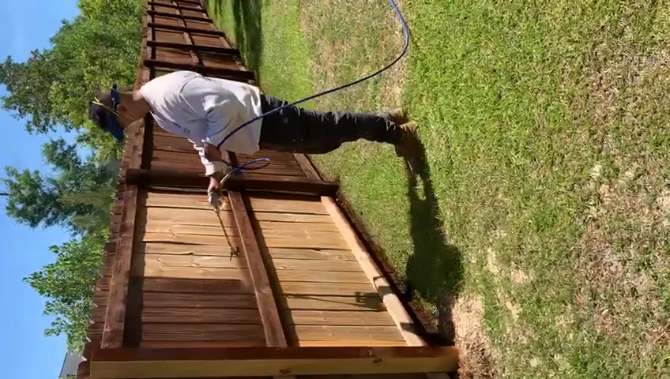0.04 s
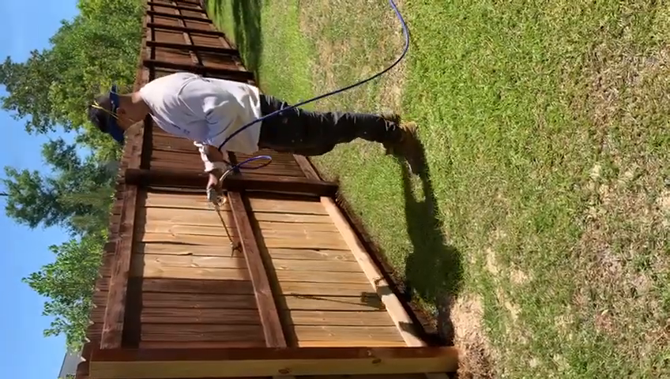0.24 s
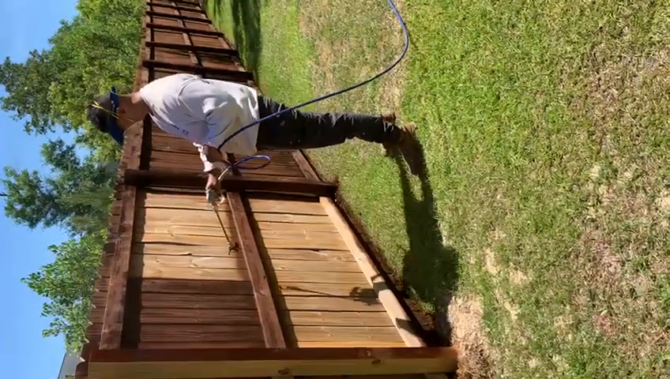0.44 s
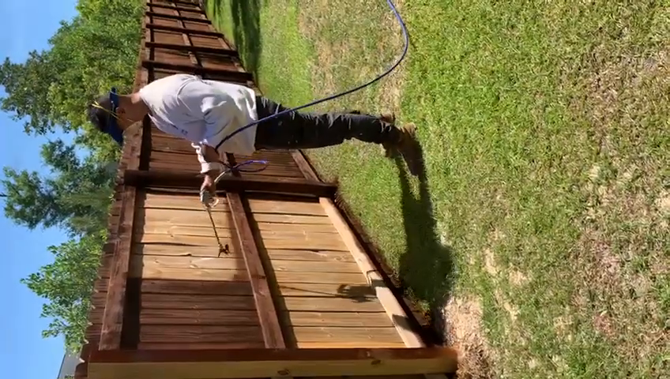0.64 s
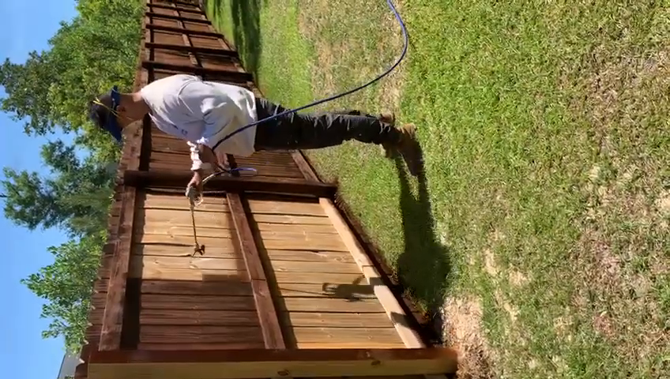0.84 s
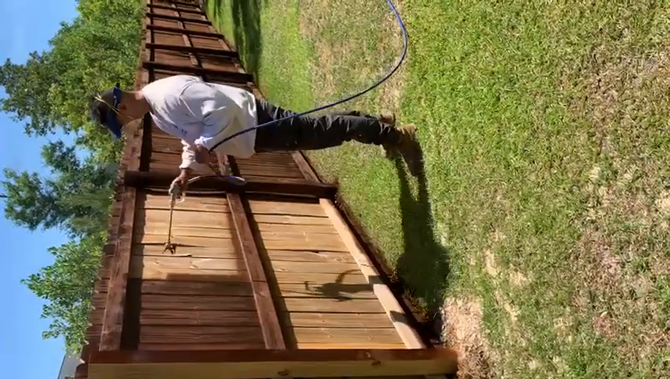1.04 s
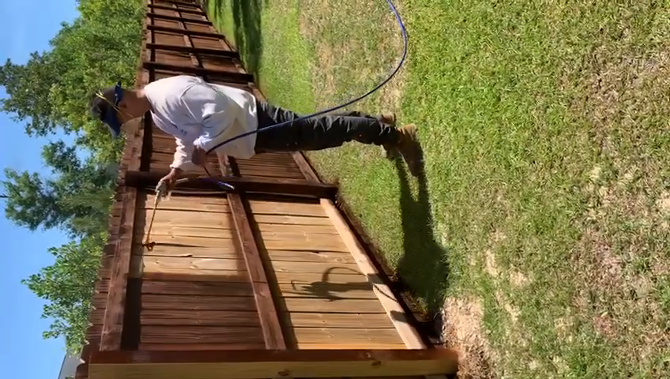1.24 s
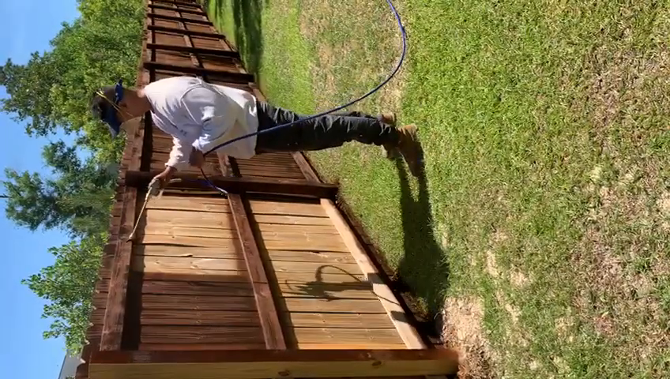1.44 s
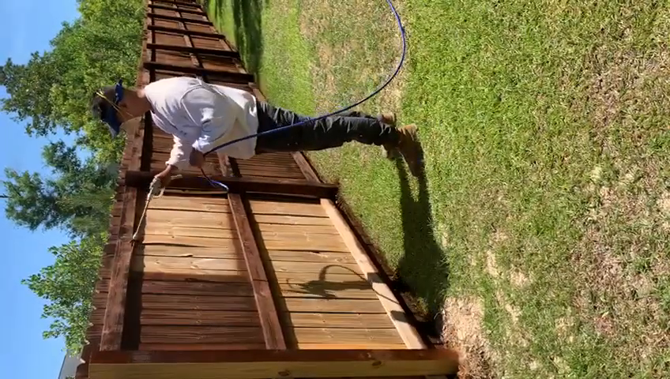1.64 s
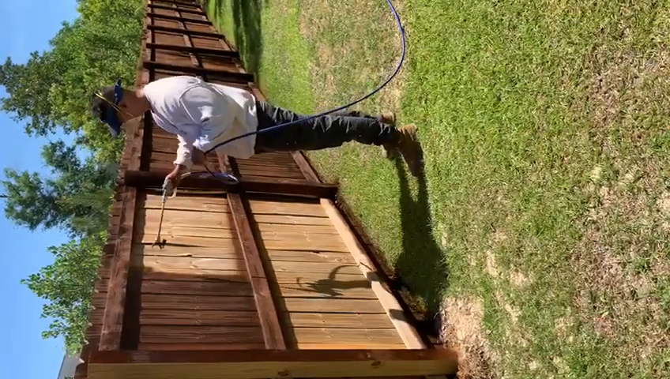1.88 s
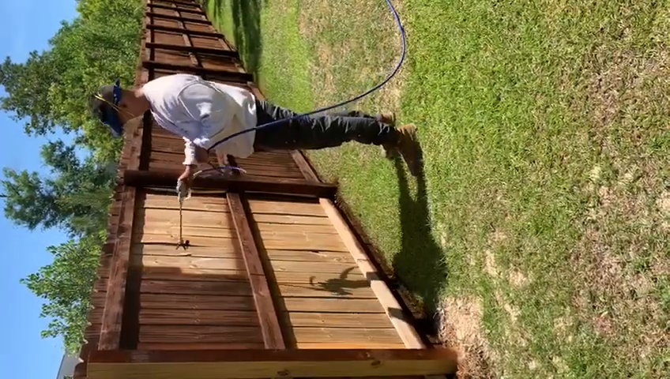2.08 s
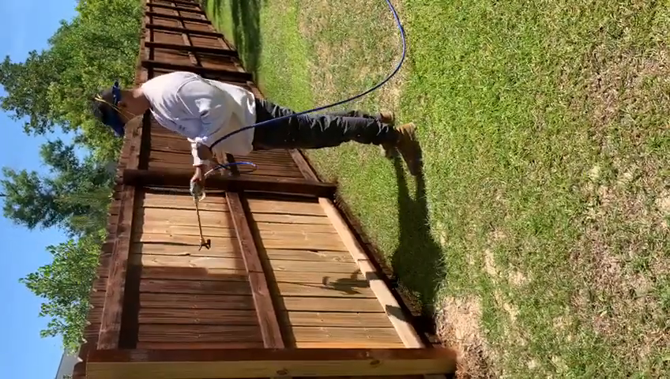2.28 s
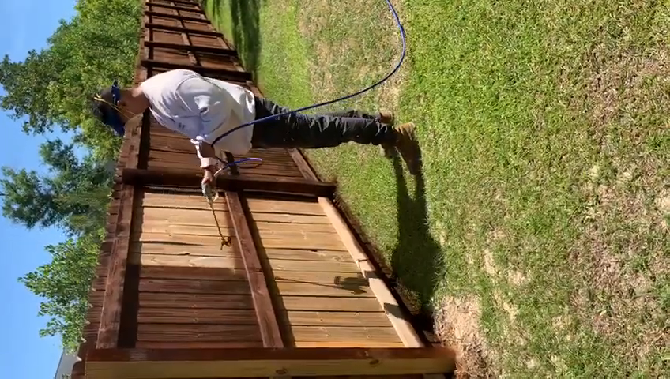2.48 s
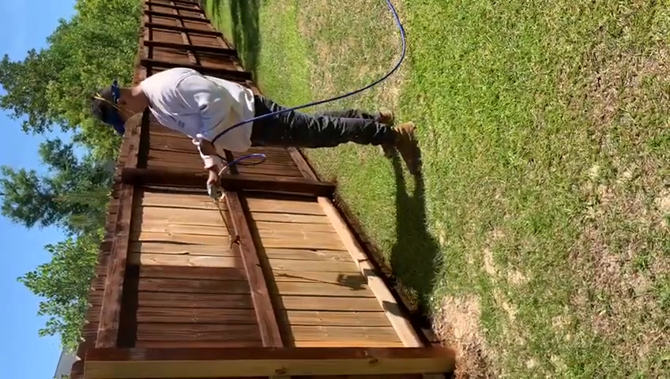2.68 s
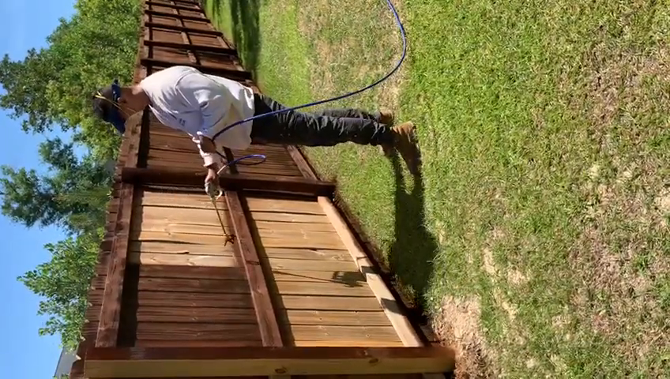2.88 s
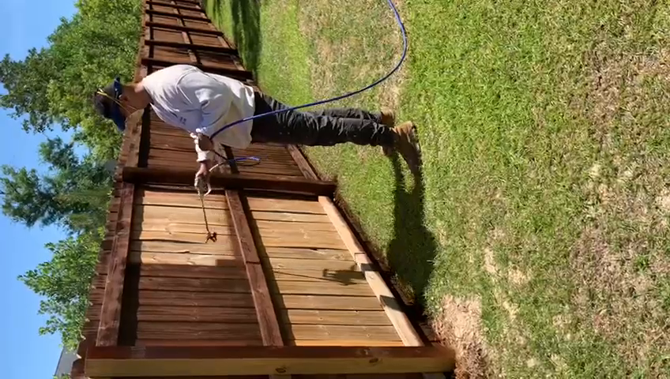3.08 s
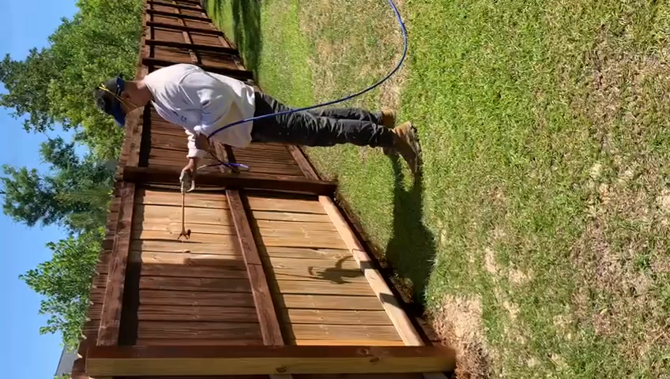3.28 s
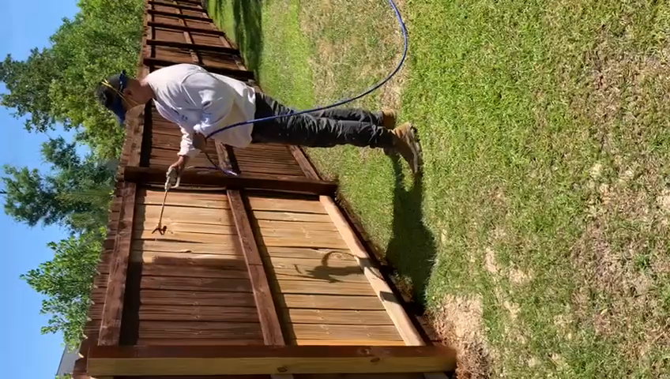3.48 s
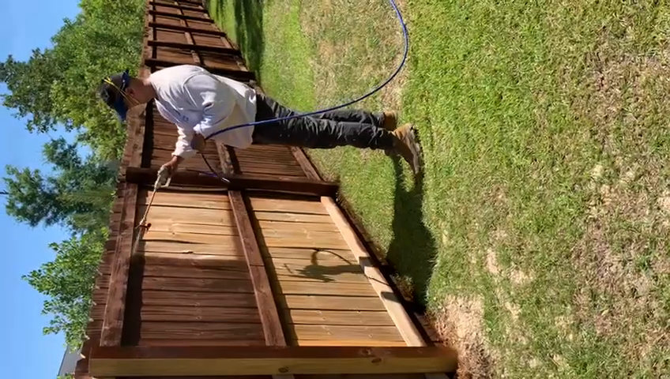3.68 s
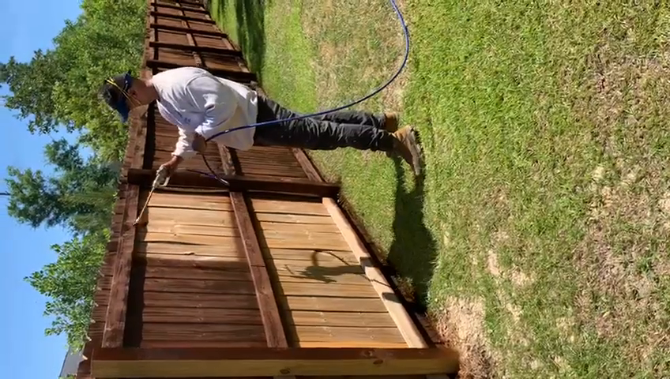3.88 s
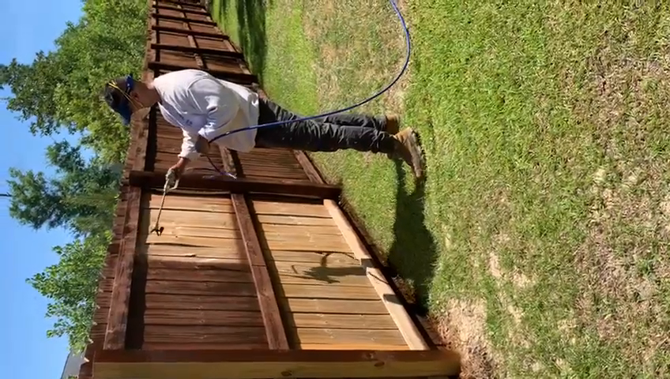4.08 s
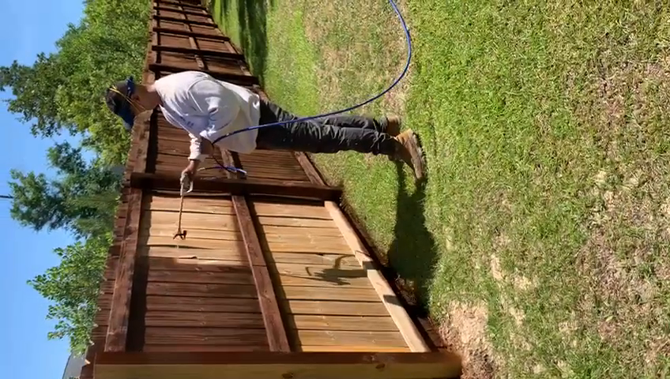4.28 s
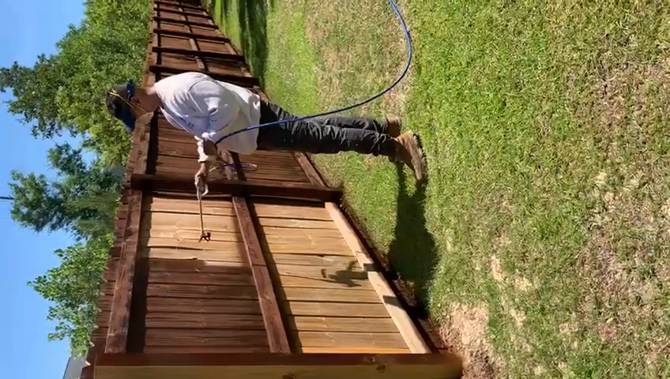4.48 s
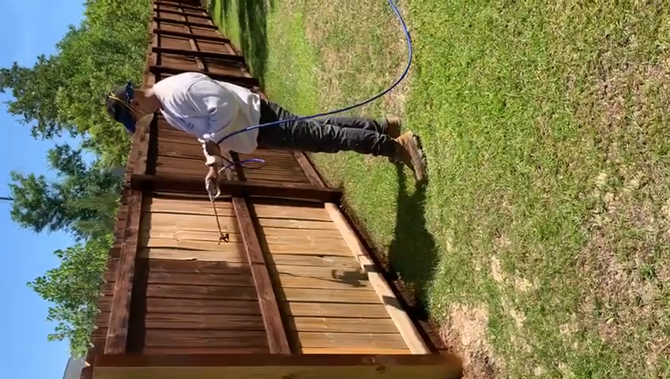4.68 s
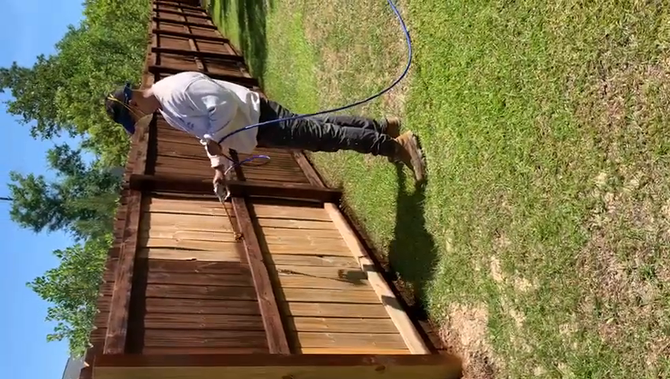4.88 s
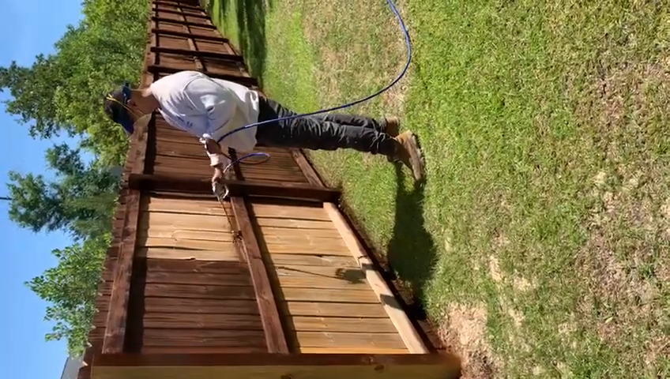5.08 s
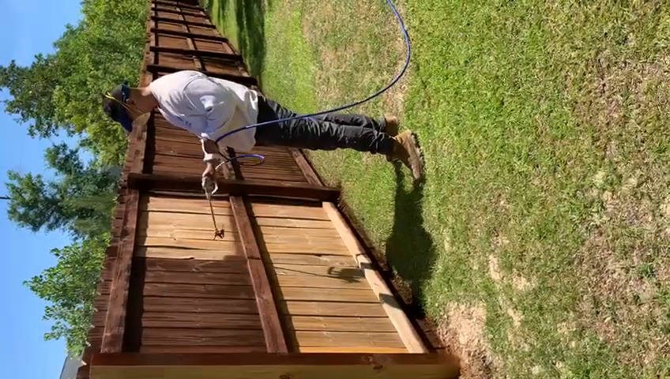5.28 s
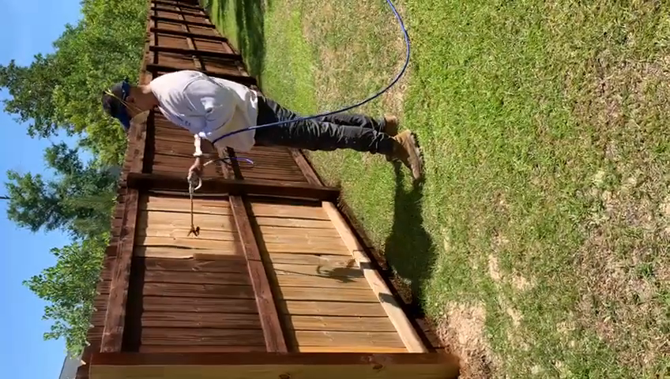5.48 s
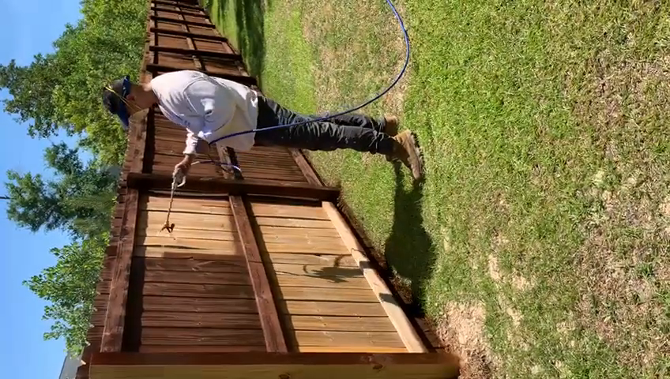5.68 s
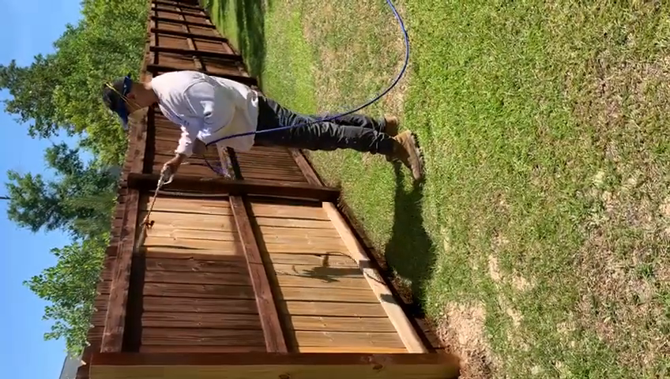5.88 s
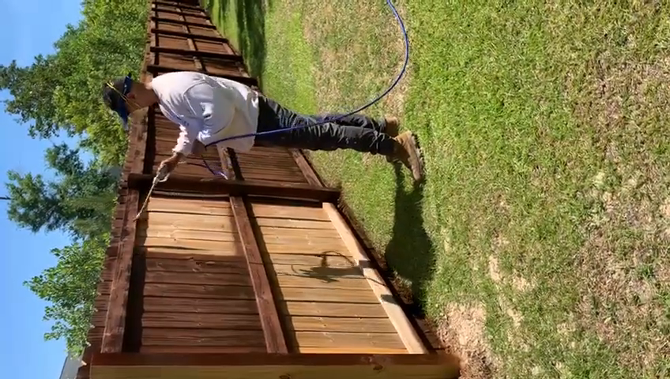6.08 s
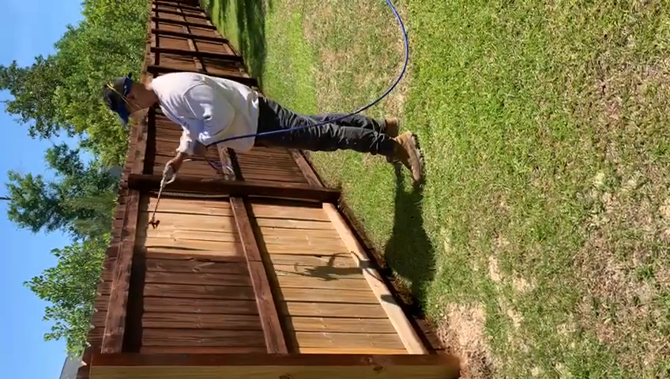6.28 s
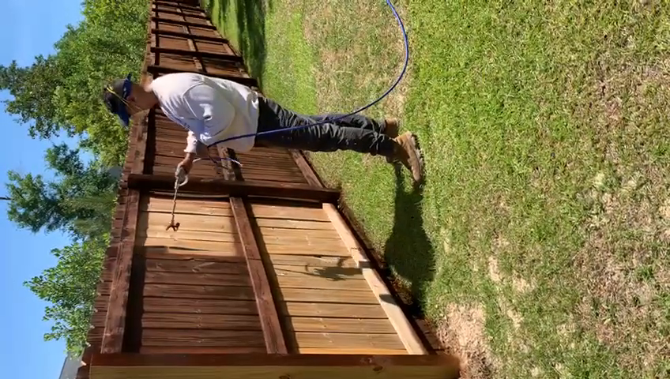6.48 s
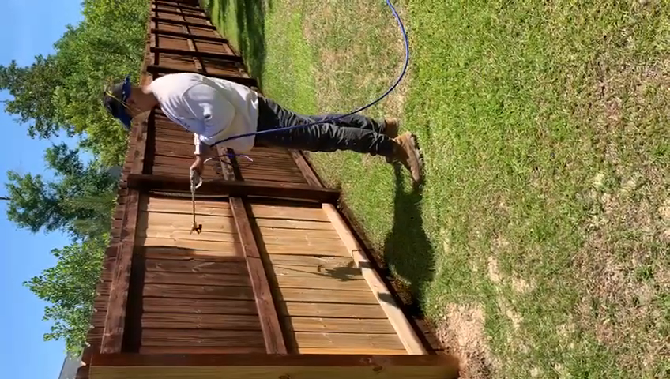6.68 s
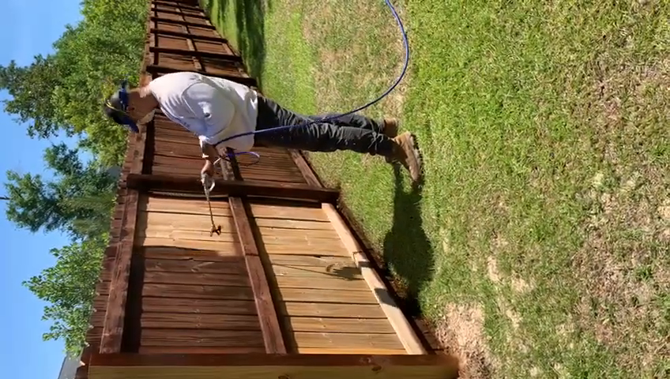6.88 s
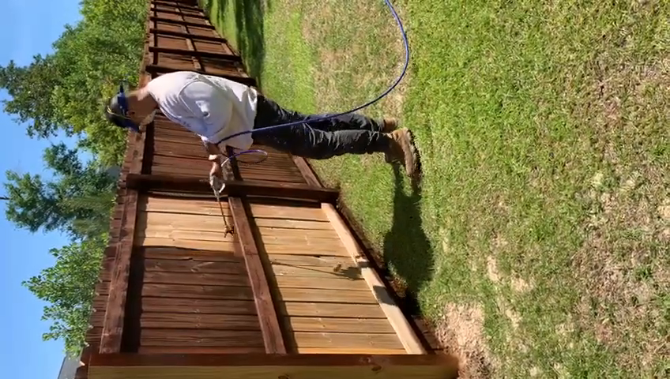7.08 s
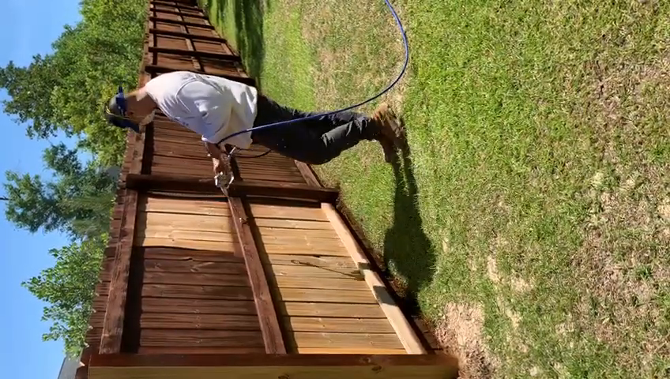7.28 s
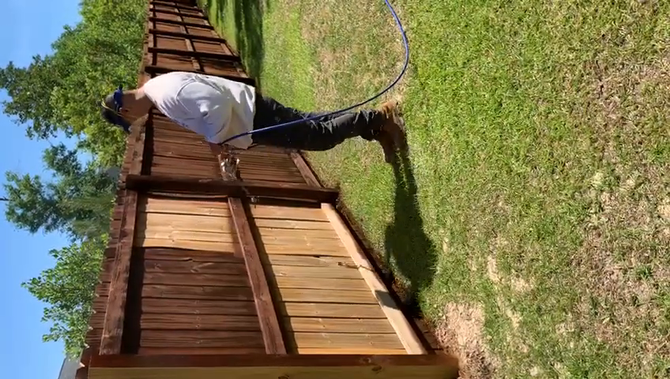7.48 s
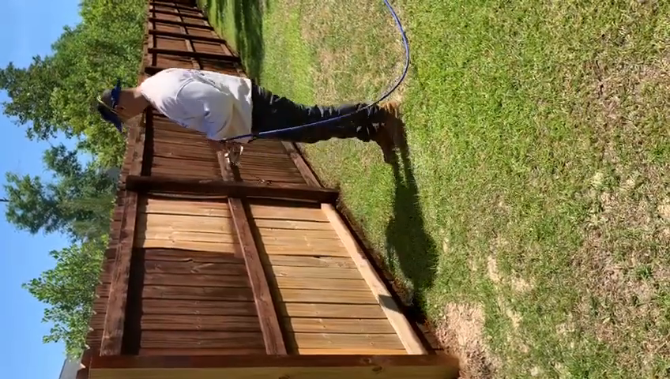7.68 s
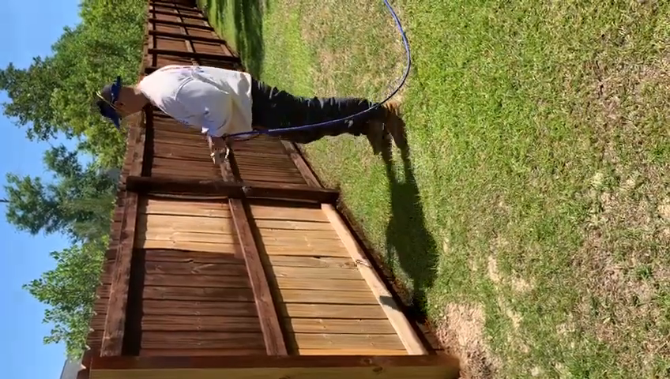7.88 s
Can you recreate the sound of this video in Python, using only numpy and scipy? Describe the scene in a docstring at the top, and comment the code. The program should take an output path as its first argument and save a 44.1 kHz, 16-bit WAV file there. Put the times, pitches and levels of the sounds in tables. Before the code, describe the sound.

Outdoors on a lawn, a few metres from the microphone, a paint sprayer coats a wooden fence in six even strokes. Each is a bright hiss with a splashy roar from the boards, and some end with a clack and sputter. A quieter pump whines and rattles in surges throughout most of it. A distant bird calls faintly twice at the start, and a brief grass scuff comes at the end.

```python
"""On a lawn, a stereo microphone a few metres from a wooden fence being stained with an airless spray gun.
The nozzle hisses, the fan of paint splashes, drums and roars on the boards, and the ground echo sweeps
as the wand falls and rises; a valve thuds and spits between strokes. Behind, the pump motor hums, whines
and works in surges over a low outdoor rumble and faint leaves. A far bird calls twice at the start;
boots and hose scuff the grass at the end."""
import sys
import numpy as np
from scipy import signal
from scipy.fft import rfft, irfft
from scipy.io import wavfile

SR = 44100
rng = np.random.default_rng(int(sys.argv[2]) if len(sys.argv) > 2 else 0)


def materialize(psi):
    """Save the field psi as 16-bit PCM at rate SR to the path in sys.argv[1].

    A 1-D psi becomes a single channel; in a 2-D psi each row is a channel.
    """
    bounded = np.clip(np.atleast_2d(psi).T, -1, 1)
    quanta = np.round(bounded * 32767).astype(np.int16)
    wavfile.write(sys.argv[1], SR, quanta)


N = 350154
T, HZ = np.arange(N) / SR, np.fft.rfftfreq(N, 1 / SR)

# trigger pulls, one a stroke, down and up in turn: open t/s, shut t/s, base hiss level/dB on opening,
# on shutting, opening spit level/dB, then the columns named below (levels before swells and flutter)
PULLS = [(-.8, 0.076, -37, -37.8, -44, -47, -51, -57, -57, 530, 520, -64, .2, 0),
         (0.507, 1.4, -38.5, -37.3, -42, -46, -57, -45.5, -52.5, 520, 565, -51, .6, -1),
         (1.646, 2.551, -36.3, -37, -39, -45.8, -52.5, -59, -58, 570, 525, -60, .35, -2.5),
         (2.809, 3.743, -41.3, -40, -39, -45.8, -50.3, -45.5, -53, 548, 515, -56, .2, 2.3),
         (3.970, 4.828, -34.2, -40.4, -45, -47.6, -53, -58, -59, 515, 570, -60, .2, 0),
         (5.081, 5.972, -38.5, -41.2, -48, -48, -51.8, -49, -55, 605, 540, -54.5, .6, 0),
         (6.231, 7.095, -36.5, -38.8, -48, -47.6, -54.5, -58, -60, 570, 530, -63, .35, 0)]
(SPLASH_DB, DRUM_DB,  # splash level/dB, drumming level/dB
 HOLLOW_OPEN_DB, HOLLOW_SHUT_DB, HOLLOW_OPEN_HZ, HOLLOW_SHUT_HZ,  # hollow between boards: level/dB, f/Hz
 ROAR_DB, GROUND_SHARE, SKIRT_DB  # roar level/dB, ground echo share/0-1, hiss's lower skirt gain/dB
 ) = np.transpose(PULLS)[5:]
# the spray thins or flares over rails and gaps: t/s, half length/s, hiss/dB, splash/dB, drumming/dB
CROSSINGS = [(.71, .06, -.5, -3.5, -4), (.88, .07, -.5, 1, 1.5), (1.11, .09, 0, -9.5, -6),
             (1.23, .03, 1.5, 5, 1), (1.29, .035, -1, .5, 4), (1.38, .04, .5, -2, -4),
             (1.86, .07, -3, -1, -1), (3.476, .022, 3.5, -14, -11), (3.57, .05, 2, 3.5, .5),
             (3.73, .04, .5, -3, -4), (4.04, .07, .5, 3.5, 3), (4.16, .03, -1, -4.5, -2),
             (4.53, .055, .5, -7, -7), (4.69, .06, -.5, -4, -2), (5.17, .07, .7, -3.5, -2.5),
             (5.53, .05, -1, 1.5, 2.5), (5.73, .09, .3, -7, -4), (5.89, .035, -.5, 2.5, 3),
             (6.24, .025, -6, -11, -7), (6.42, .08, 1, 1.5, 2.5), (6.97, .05, .5, .5, 3.5)]
# loose boards that boom as the fan passes: t/s, f/Hz, level/dB
LOOSE_BOARDS = [(2.875, 185, -43), (6.97, 435, -53)]

# noise spectra: f/Hz, relative level/dB
JET_SPECTRUM = [(1500, -32), (5500, -19), (7400, -12), (8000, -3), (9200, -1), (10300, .5), (11400, 0),
                (11850, -7.5), (12200, -27)]
SPLASH_SPECTRUM = [(300, -4), (850, -7), (1130, 1.5), (1550, 0), (2000, -3.5), (2600, -2.5), (3300, 0),
                   (4100, -3.5), (5700, 3), (7300, 5.5), (8500, 1.5), (11400, -2), (12200, -20)]
DRUM_SPECTRUM = [(60, -28), (130, -3), (210, 2), (310, 3), (420, -6.5), (680, -7), (860, -14), (1200, -6),
                 (2500, -48)]
RUMBLE_SPECTRUM = [(10, -40), (25, -26), (35, -21), (55, 1), (85, 2), (110, -7.5), (160, -10), (260, -17),
                   (600, -63)]
AIR_SPECTRUM = [(20, -36), (100, 7.5), (240, -5), (400, -6), (650, -1.5), (900, -10.5), (1300, -6.5),
                (1900, -19), (5000, -21), (6500, -20.5), (11500, -26), (12500, -71)]
SPIT_SPECTRUM = [(500, -20), (1400, 0), (2200, -4), (2800, -3), (3200, 3), (4000, -3), (5400, 4),
                 (6200, -3), (7300, -1), (8800, -8), (11500, -30)]
GRASS_SPECTRUM = [(200, -14), (550, 9.5), (900, -6), (2500, -6.5), (5000, -3), (8000, -3), (11000, 4),
                  (12200, -19)]

# the motor's tones: f/Hz, level/dB
MOTOR_TONES = [(119.5, -67.5), (240, -72.5), (1440, -74), (1560, -66)]
# resonances of the pump housing and of the valve: f/Hz, width/Hz, relative level/dB
HOUSING_MODES = [(1102, 65, 1), (1215, 15, 3.5), (1336, 26, 7.5), (1445, 40, 1.5), (1555, 90, 5)]
VALVE_MODES = [(1560, 130, -3), (3200, 260, 0), (5540, 280, 1), (7150, 350, 0)]
# load on the pump, which rests while the hose is full: t/s, rattle level/dB
PUMP_LOAD = [(0, -59), (.25, -82), (1.15, -80), (1.42, -54), (1.6, -51.5), (2.1, -60), (2.33, -50.5),
             (2.7, -56), (3.4, -58), (4.05, -57), (4.35, -67), (4.95, -59), (6.1, -59), (7.3, -58.5),
             (7.6, -72)]
# gusts of breeze: t/s, half length/s, level/dB
GUSTS = [(1.28, 0.055, -52), (1.75, .1, -55), (2.65, .09, -53), (6.95, 0.13, -49.5)]
# a far bird's slurred notes: t/s, half length/s, first f/Hz, last f/Hz, level/dB
BIRD_NOTES = [(0.21, 0.041, 4400, 3640, -71), (.375, 0.039, 4400, 3780, -69)]
# spits of pressure after strokes: t/s, level/dB, rise/s, t60/s, upper edge f/Hz
SPITS = [(2.596, -46.5, .003, .3, 7500), (4.972, -47, .006, .17, 9000), (6.061, -48.5, .003, .24, 7000),
         (7.197, -57.5, .002, .2, 4500), (7.243, -61, .008, .45, 4800)]
# the valve's clacks: t/s, level/dB
CLACKS = [(2.596, -43), (4.973, -42.5), (6.062, -43.5)]
# boots and hose in the grass: t/s, level/dB, rise/s, fall/s
SCUFFS = [(7.135, -60, 0.072, 0.055), (7.831, -47, 0.02, 0.022)]

# how alike left and right sound in each band: f/Hz, likeness/0-1
STEREO_LIKENESS = [(90, .98), (280, .84), (520, .93), (1200, .68), (2100, .4), (2650, .65), (3650, .65),
                   (4100, .998), (5050, .998), (5700, .7), (6500, .98), (7700, .85), (8500, .998),
                   (9150, .998), (10000, .8), (11000, .98), (12200, .75)]
# phase of left against right in each band, which spreads the hiss: f/Hz, phase/rad
STEREO_PHASE = [(100, 0), (800, .4), (1600, -1.1), (2350, .2), (2650, 2.6), (3000, 1.9), (3600, 2.1),
                (4100, 3.1), (5100, 3.2), (6200, 6.1), (7500, 6.5), (8450, 9.38), (9250, 9.47),
                (10600, 12.4), (11500, 13.5), (12200, 13.9)]
# left minus right in each band: f/Hz, level/dB
STEREO_BALANCE = [(100, 0), (550, -1), (900, 2), (1400, -1), (2200, -3), (2500, 1), (3000, -4), (4000, 0)]


def gain_of(db):
    return 10 ** (np.asarray(db) / 20)


def unit_rms(x):
    return x / np.sqrt(np.mean(x ** 2) + 1e-20)


def curve(points):
    """A table over frequency, joined on a log axis."""
    hz, value = np.transpose(points)
    return np.interp(np.log(HZ + 1), np.log(hz + 1), value)


def lowpass(x, edge_hz, slope):
    return irfft(rfft(x) / (1 + (HZ / edge_hz) ** slope), N)


def waver(rate_hz):
    """Random drift of unit size."""
    return unit_rms(lowpass(rng.standard_normal(N), rate_hz, slope=4))


def noise(gain):
    """Coloured stereo noise: left and right partly alike, and shifted in phase."""
    left, other = rfft(rng.standard_normal((2, N)))
    same = np.clip(curve(STEREO_LIKENESS), 0, 1)
    balance = gain_of(curve(STEREO_BALANCE) / 2)
    right = (same * left + np.sqrt(1 - same ** 2) * other) * np.exp(-1j * curve(STEREO_PHASE))
    return unit_rms(irfft(np.array([left * balance, right / balance]) * gain, N))


def shaped_noise(spectrum):
    return noise(gain_of(curve(spectrum)))


def peaks(rows):
    """The gain of a set of resonances: f/Hz, width/Hz, level/dB."""
    return sum(gain_of(db) / (1 + (2 * (HZ - hz) / width) ** 2) for hz, width, db in rows)


def resonate(x, hz, width_hz):
    """A resonance of gain 1 that follows the pitch hz."""
    turn = np.exp(2j * np.pi * np.cumsum(hz * np.ones(N)) / SR)
    pole = np.exp(-np.pi * width_hz / SR)
    return 2 * (turn * signal.lfilter([1 - pole], [1, -pole], x / turn)).real


def rough_tone(air, hz, width_hz):
    """Noise narrowed to a fuzzy pitch."""
    return unit_rms(resonate(resonate(air, hz, width_hz), hz, width_hz))


def swells(rows):
    """Smooth bumps: t/s, half length/s, level/dB."""
    return sum(gain_of(db) * np.exp(-((T - s) / half) ** 2) for s, half, db in rows)


def puff(s, db, rise, t60):
    """An envelope that rises quickly and dies away."""
    age = np.maximum(T - s, 0)
    return np.minimum(age / rise, 1) * gain_of(db - 60 * age / t60)


def trigger(rise=.01, fall=.0096):
    """Flow through the gun, one row a pull: it builds when the valve opens and dies when it shuts."""
    return np.array([(1 - np.exp(-np.maximum(T - on, 0) / rise)) * np.exp(-np.maximum(T - off, 0) / fall)
                     for on, off, *_ in PULLS])


def per_pull(first, last=None):
    """A control that holds through each pull, or slides from first to last."""
    values = np.column_stack([first, first if last is None else last])
    return np.interp(T, np.array(PULLS)[:, :2].ravel(), values.ravel())


def wand_height():
    """0 at the bottom of a stroke, 1 at the top; the wand slows at each end."""
    rising = np.arange(len(PULLS)) % 2
    return np.sin(np.pi / 2 * per_pull(1 - rising, rising)) ** 2


def crossing_db(layer):
    """A layer's change of level as the fan crosses rails and gaps."""
    column = ("hiss", "splash", "drum").index(layer)
    return sum(changes[column] * np.exp(-((T - s) / half) ** 2) for s, half, *changes in CROSSINGS)


def nozzle(spit_s=.005, mist_db=-20, skirt_hz=8200, skirt_width_hz=1000):
    """The jet opens with a spit, hisses as the sheet of paint tears into mist, and trails off."""
    pressure = np.array([gain_of(np.interp(T, [on, off], [first, last]))
                         for on, off, first, last, *_ in PULLS])
    mist = gain_of(mist_db)
    flow = (trigger(rise=.006, fall=.0047) + mist * trigger(rise=.006, fall=.028)) / (1 + mist)
    flutter_db = .7 * waver(rate_hz=130) + .65 * waver(rate_hz=18)
    level = (pressure * flow).sum(0) * gain_of(crossing_db("hiss") + flutter_db)
    spit = 0
    for on, _, _, _, spit_db, *_ in PULLS:
        age = np.maximum(T - on, 0) / spit_s
        spit += gain_of(spit_db) * age * np.exp(1 - age)
    jet = shaped_noise(JET_SPECTRUM)
    skirt = irfft(rfft(jet) * np.exp(-((HZ - skirt_hz) / skirt_width_hz) ** 2), N)
    jet += skirt * (gain_of(per_pull(SKIRT_DB)) - 1)
    return jet * level + shaped_noise(SPLASH_SPECTRUM) * spit


def boards(midspan_db=2.5):
    """The blast drums on the boards, most midway between the rails, and shakes the loose ones."""
    span_db = midspan_db * (np.sin(np.pi * wand_height()) - .5)
    drum_db = per_pull(DRUM_DB) + span_db + crossing_db("drum")
    drum = shaped_noise(DRUM_SPECTRUM) * gain_of(drum_db + 1.62 * waver(rate_hz=36))
    blast = noise(1)
    booms = sum(unit_rms(resonate(blast, hz, width_hz=41)) * swells([(s, .06, db)])
                for s, hz, db in LOOSE_BOARDS)
    return (drum + booms) * trigger().sum(0)


def splash(coarse_edge_hz=4700, colour_db=1.4, clumps_per_s=170, clump_s=.0022, lift_db=4.5):
    """Fine drops fizz on the wood; coarse ones spatter in clumps, their colour drifting."""
    drops = rfft(shaped_noise(SPLASH_SPECTRUM))
    coarse = drops / (1 + (HZ / coarse_edge_hz) ** 10)
    centres_hz = np.geomspace(700, 4500, 6)
    spatter = 0
    for weights in np.eye(len(centres_hz)):
        band = irfft(coarse * np.interp(HZ, centres_hz, weights), N)
        spatter += band * gain_of(colour_db * waver(rate_hz=9))
    hits = (rng.random(N) < clumps_per_s / SR) * rng.exponential(1, N)
    clumps = signal.lfilter([1], [1, -np.exp(-1 / (clump_s * SR))], hits)
    spatter *= unit_rms(1 + .33 * clumps) * gain_of(.75 * crossing_db("splash") - .7)
    fizz = irfft(drops - coarse, N) * gain_of(crossing_db("splash"))
    level_db = per_pull(SPLASH_DB) + lift_db + .66 * waver(rate_hz=19) + .56 * waver(rate_hz=250)
    return (fizz + spatter) * gain_of(level_db) * trigger(rise=.014, fall=.0077).sum(0)


def roar(hz=700, width_hz=430, bottom_db=-16):
    """On the upper boards the blast adds a broad, throaty roar."""
    level_db = per_pull(ROAR_DB) + bottom_db * (1 - wand_height()) ** 3 + crossing_db("drum")
    return noise(peaks([(hz, width_hz, 0)]) ** 2) * gain_of(level_db) * trigger().sum(0)


def echo(x, lag_ms, share, dull_hz):
    """A surface adds a late, dull copy: a comb that slides with the lag."""
    dull = lowpass(x, dull_hz, slope=2)
    return x + share * np.array([np.interp(T - lag_ms / 1000, T, side) for side in dull])


def spray(bottom_lag_ms=2.1, top_lag_ms=3.2):
    """The spray reaches the microphone directly, off the fence and off the ground."""
    direct = nozzle() + boards() + splash() + roar()
    with_fence = echo(direct, lag_ms=1.82, share=.22, dull_hz=2500)
    ground_lag_ms = bottom_lag_ms + (top_lag_ms - bottom_lag_ms) * wand_height()
    return echo(with_fence, ground_lag_ms, per_pull(GROUND_SHARE), dull_hz=2440)


def hollow(wander_hz=7):
    """The blast blows across the hollow between boards: a rough tone that partly follows the drumming."""
    hz = per_pull(HOLLOW_OPEN_HZ, HOLLOW_SHUT_HZ) + wander_hz * waver(rate_hz=25)
    tone = rough_tone(noise(1), hz, width_hz=85)
    level_db = per_pull(HOLLOW_OPEN_DB, HOLLOW_SHUT_DB) + .45 * crossing_db("drum")
    return tone * gain_of(level_db + 1.4 * waver(rate_hz=45)) * trigger().sum(0)


def yard(x, t60=.3, tail_db=-21, echoes_per_s=3000):
    """Fences and trees scatter a thin, short tail that loses its top."""
    t = T[:SR // 2]
    taps = rng.standard_normal(len(t)) * (rng.random(len(t)) < echoes_per_s / SR)
    taps *= (t > .006) * gain_of(-60 * t / t60)
    tail = signal.fftconvolve(x, taps[None] / np.linalg.norm(taps), axes=1)[:, :N]
    return x + gain_of(tail_db) * lowpass(tail, edge_hz=9000, slope=4)


def piston(push_at_s=1.54, period_s=.574):
    """Seconds from the middle of the nearest push, and the slack: 0 in mid-push, 1 between pushes."""
    from_push_s = ((T - push_at_s) / period_s + .5) % 1 * period_s - period_s / 2
    return from_push_s, np.sin(np.pi * from_push_s / period_s) ** 2


def surges(slack_db):
    """The pump's effort follows its load, peaks in each push of the piston and flutters."""
    _, slack = piston()
    load_db = np.interp(T, *np.transpose(PUMP_LOAD))
    return gain_of(load_db + slack_db * slack + 1.6 * waver(rate_hz=14))


def pump(stop_s=7.73, idle_db=-75.5, clatter_db=-16.5):
    """Mains hum and whine from the motor; each surge rattles the housing, with a bright clatter."""
    running = np.clip((stop_s - T) / .013, 0, 1)
    unsteady_t = T + np.cumsum(.00082 * waver(rate_hz=13)) / SR
    tones = 0
    for hz, db in MOTOR_TONES:
        stereo_phase = np.interp(hz, HZ, curve(STEREO_PHASE)) * np.array([[0], [1]])
        level = np.sqrt(2) * gain_of(db + 2 * waver(rate_hz=16))
        tones += level * np.sin(2 * np.pi * hz * unsteady_t - stereo_phase)
    rattle = noise(peaks(HOUSING_MODES))
    clatter = gain_of(clatter_db) * noise(peaks([(2900, 2600, 0)]))
    effort = gain_of(idle_db) + surges(slack_db=-5)
    return running * (tones + (rattle + clatter) * effort)


def gears(mid_push_hz=1185, sag_hz_per_s=520, trim_db=-5):
    """The geared drive whirrs downward under the load of each push."""
    from_push_s, _ = piston()
    whirr = rough_tone(noise(1), mid_push_hz - sag_hz_per_s * from_push_s, width_hz=38)
    return whirr * gain_of(trim_db) * surges(slack_db=-12)


def leaves(hz=3500, width_hz=1100, level_db=-77):
    """A faint rustle that comes and goes."""
    return noise(peaks([(hz, width_hz, 0)])) * gain_of(level_db + 4.5 * waver(rate_hz=6))


def outdoors(breeze_db=-58, drone_hz=87, drone_db=-61, air_db=-62.5):
    """Breeze, a far engine's wavering drone and the soft hiss of the open air."""
    rumble = shaped_noise(RUMBLE_SPECTRUM) * np.hypot(gain_of(breeze_db), swells(GUSTS))
    turns = np.cumsum(drone_hz + 1.55 * waver(rate_hz=3.5)) / SR
    drone = gain_of(drone_db + 3.4 * waver(rate_hz=.6)) * np.sin(2 * np.pi * turns)
    air = shaped_noise(AIR_SPECTRUM) * gain_of(air_db + 1.6 * waver(rate_hz=1))
    return rumble + drone + air


def valve_thud(hz=112, t60=.13, level_db=-48):
    """Each shutting of the valve jolts wand and hose."""
    ages = [np.maximum(T - off, 0) for _, off, *_ in PULLS]
    return sum(gain_of(level_db - 60 * age / t60) * np.sin(2 * np.pi * hz * age) for age in ages)


def bird():
    """Thin falling whistles, blurred by distance."""
    air = noise(1)
    song = 0
    for s, half, first_hz, last_hz, db in BIRD_NOTES:
        hz = np.interp(T, [s - half, s + half], [first_hz, last_hz])
        song += rough_tone(air, hz, width_hz=150) * swells([(s, half, db)])
    return song


def spits():
    """After some strokes the valve clacks and sputters; a last drop ticks from the shut nozzle."""
    sputter = 0
    for s, db, rise, t60, edge_hz in SPITS:
        colour = gain_of(curve(SPIT_SPECTRUM)) / (1 + (HZ / edge_hz) ** 6)
        sputter += noise(colour) * puff(s, db, rise, t60)
    clacks = noise(peaks(VALVE_MODES)) * sum(puff(s, db, rise=.001, t60=.06) for s, db in CLACKS)
    tick = shaped_noise(JET_SPECTRUM) * puff(s=7.179, db=-50.5, rise=.002, t60=.05)
    return sputter * gain_of(2 * waver(rate_hz=160)) + clacks + tick


def scuffs():
    """Boots and hose brush the grass in brisk, grainy swishes."""
    level = sum(gain_of(db) * np.exp(-np.maximum((s - T) / rise, (T - s) / fall))
                for s, db, rise, fall in SCUFFS)
    return shaped_noise(GRASS_SPECTRUM) * level * gain_of(1.7 * waver(rate_hz=450))


def scene():
    """The work at the fence with the yard's tail, over the pump and the open air."""
    at_fence = yard(spray() + hollow() + spits() + scuffs()) + valve_thud()
    return at_fence + pump() + gears() + bird() + leaves() + outdoors()


def record(dry, edge_hz=12400):
    """The recorder's band limit."""
    taps = signal.firwin(511, edge_hz, window=("kaiser", 9), fs=SR)
    return signal.oaconvolve(dry, taps[None], "same")


dry = scene()
out = record(dry)
materialize(out)
```